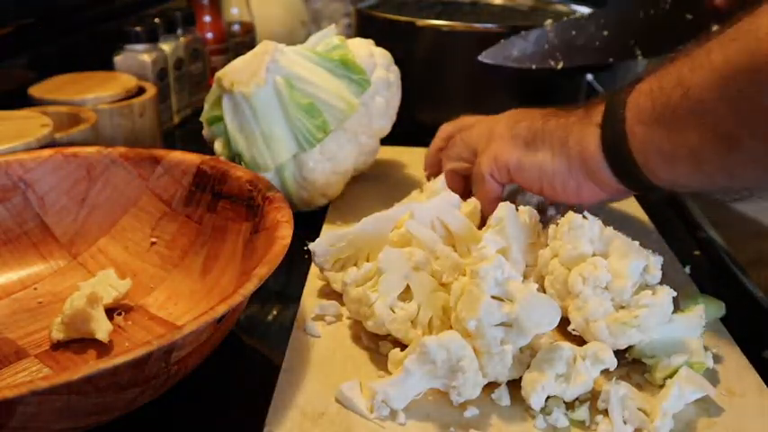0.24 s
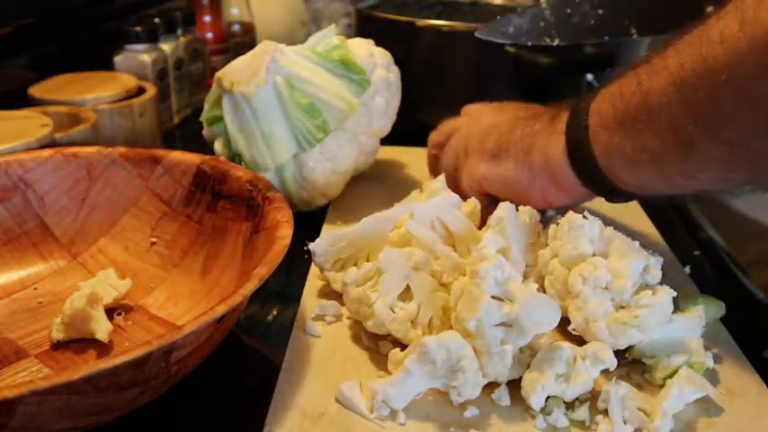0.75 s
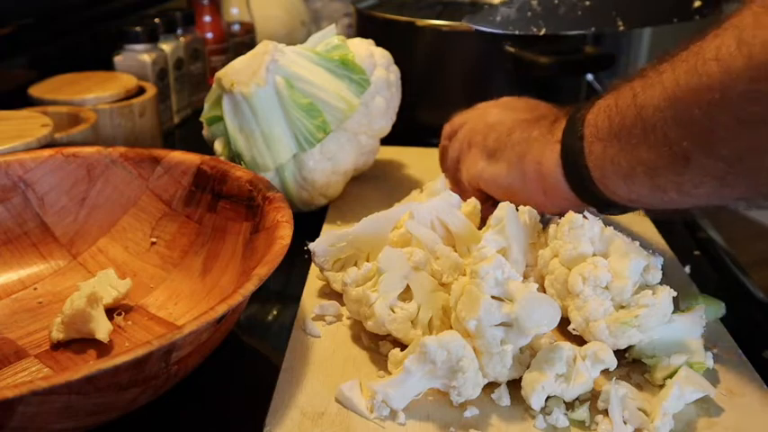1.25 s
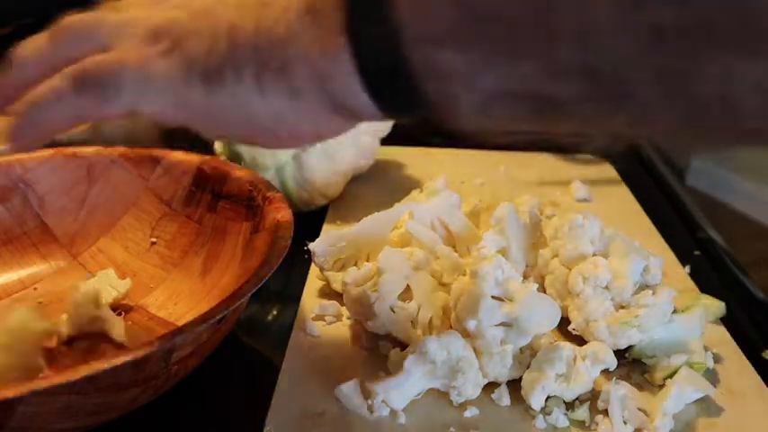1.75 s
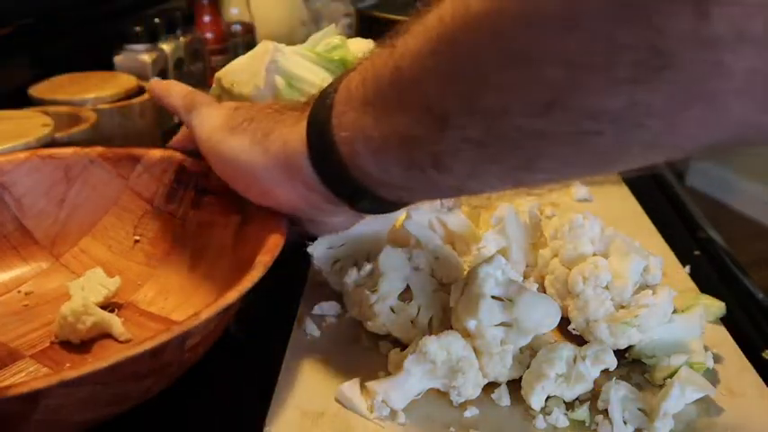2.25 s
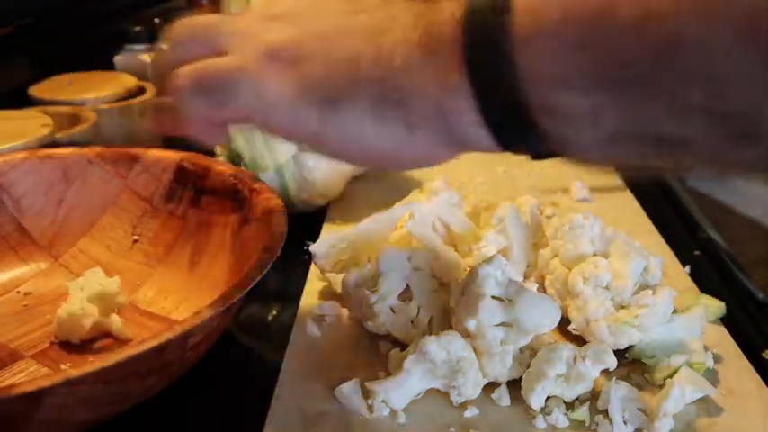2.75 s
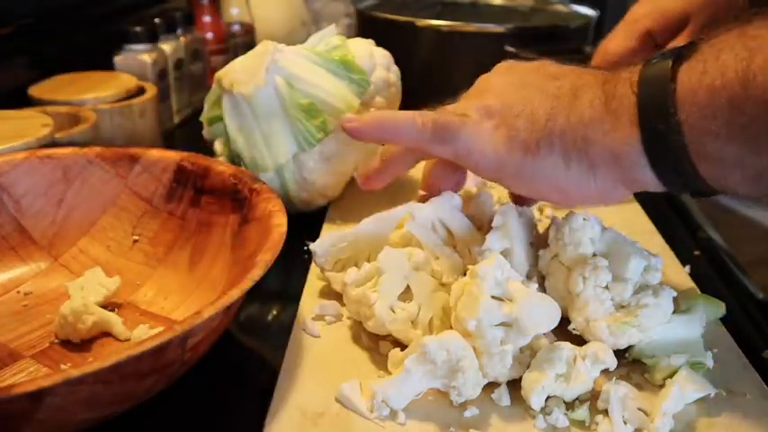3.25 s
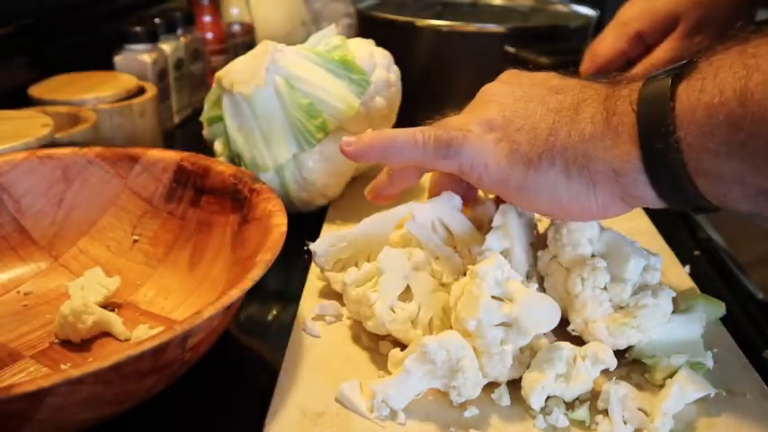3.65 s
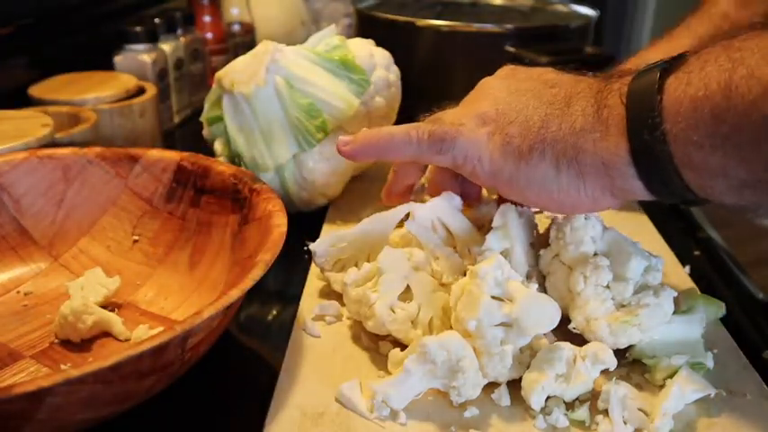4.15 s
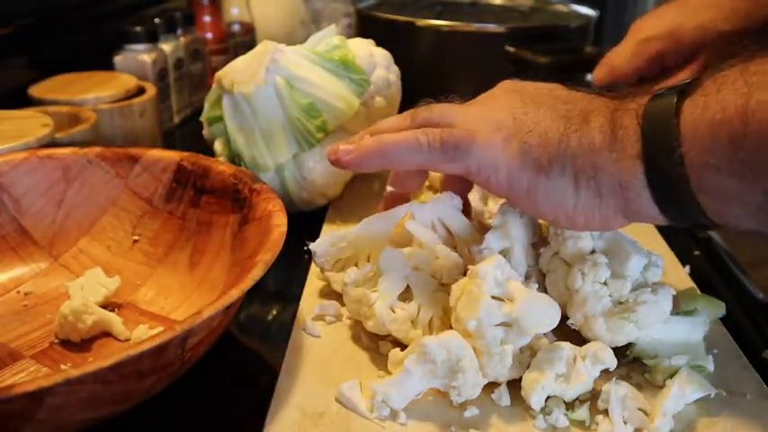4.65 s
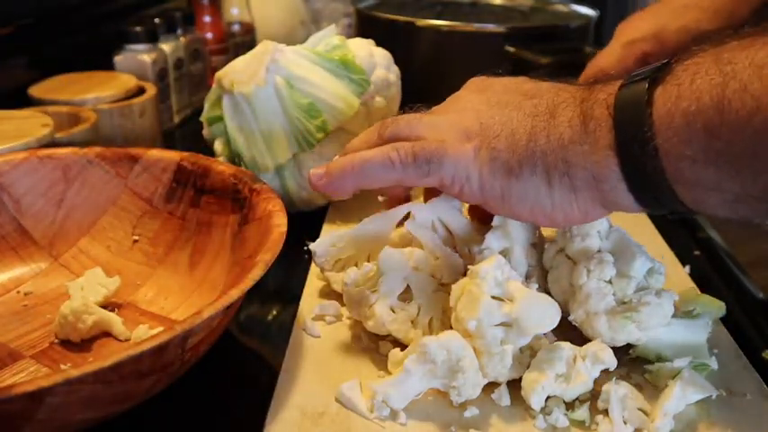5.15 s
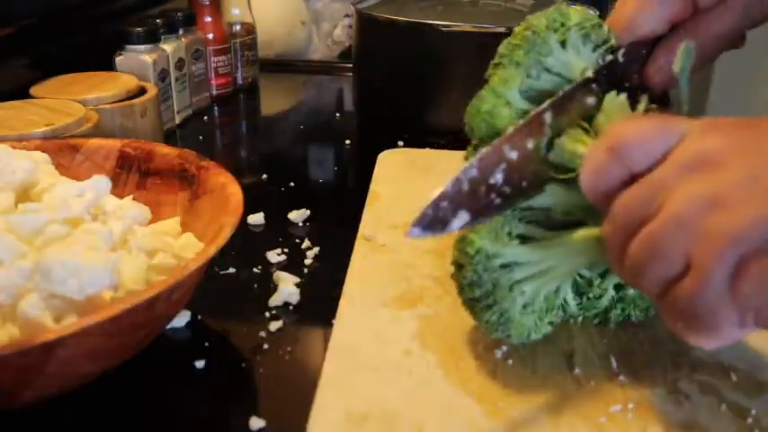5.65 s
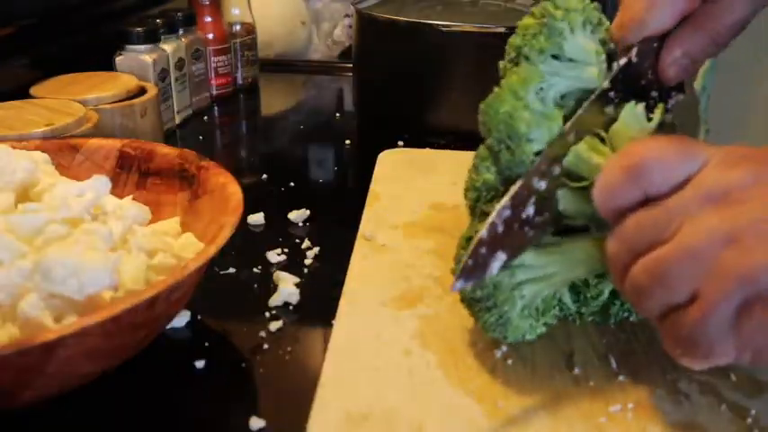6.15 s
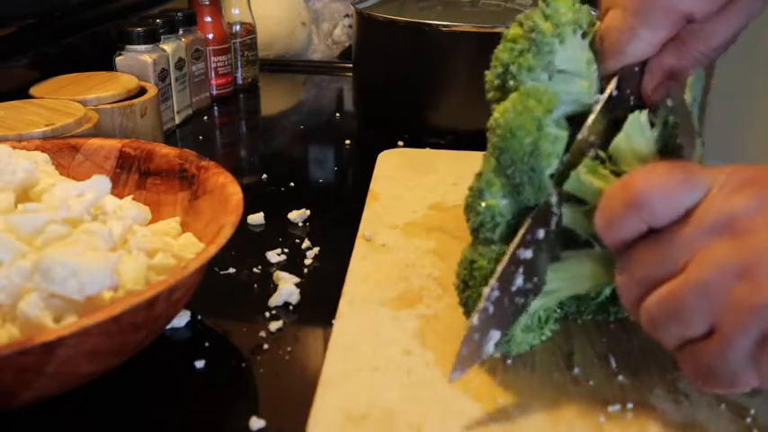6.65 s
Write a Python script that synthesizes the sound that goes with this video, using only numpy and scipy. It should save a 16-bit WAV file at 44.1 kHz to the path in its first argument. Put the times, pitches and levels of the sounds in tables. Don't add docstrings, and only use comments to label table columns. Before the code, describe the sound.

A low, steady refrigerator hum and soft room hush lie under everything in a small home kitchen, heard closely by one microphone, alike on both channels. From 0 to 1.2 seconds fingers rustle very quietly among dry florets, with faint ticks and soft knocks near 0.5 and 1.0, and a tiny dropout around 0.84. At 1.8 pieces hit a wooden bowl in a bright, hollow rattle, rolling and knocking until about 2.4. A piece taps and bounces on the board from 2.8 to 3.1, then it is nearly quiet. Around 4.1 a quick tearing scrape ends in a very loud, hard knife bang at 4.15, with a short room tail. From 5.25, and more fully after 5.45 as the hum drops, short wet sawing strokes crackle through stems; fibres snap at 5.9 and 6.2, judder to 6.3, snap loudest at 6.62, and finish with a dull push.

```python
import sys
import numpy as np
from scipy import signal
from scipy.fft import rfft, irfft, next_fast_len
from scipy.io import wavfile
from scipy.ndimage import uniform_filter1d

SR = 44100
rng = np.random.default_rng(int(sys.argv[2]) if len(sys.argv) > 2 else 0)


def to_wav(s):
    ch = np.atleast_2d(s).T
    pcm = np.round(np.clip(ch, -1, 1) * 32767)
    wavfile.write(sys.argv[1], SR, pcm.astype(np.int16))


def nominal_scale(level):
    x = np.asarray(level, float) / 20
    return 10 ** x


N = 303849

# (time [s], level [dB])
CHOP = (4.1531, 3)


def unit(x):
    return x / np.sqrt(np.mean(x ** 2) + 1e-20)


def along(points, hz):
    f, v = np.transpose(points)
    return np.interp(np.log(hz + 1), np.log(f + 1), v)


def filtered(x, response):
    m = next_fast_len(len(x) + min(len(x), 8192))
    spectrum = rfft(x, m) * response(np.fft.rfftfreq(m, 1 / SR))
    return irfft(spectrum, m)[:len(x)]


def resonance(hz, width_hz):
    return lambda f: 1j * f * width_hz / (hz * hz - f * f + 1j * f * width_hz)


def colour(spectrum):
    return lambda f: nominal_scale(along(spectrum, f))


def noise(spectrum):
    return unit(filtered(rng.standard_normal(N), colour(spectrum)))


def add(track, s, sound):
    part = track[round(s * SR):][:len(sound)]
    part += sound[:len(part)]


def refrigerator():
    # (time [s], level [dB])
    hush = [(15, -55), (25, -31), (85, -19), (130, -13), (200, -10), (260, -11), (420, -16), (630, -21),
            (1000, -25), (1600, -27), (2100, -33), (4000, -36), (8000, -40.5), (16200, -44)]
    hush_level = [(0, -62.5), (5.43, -62.5), (5.47, -64.5), (6.89, -62.5)]
    # (time [s], level [dB])
    hum_level = [(0, -62.5), (5.43, -62), (5.47, -71), (6.89, -77)]
    # (frequency [Hz], width [Hz], level [dB])
    cabinet = [(186, 5.5, -64.5), (235, 11, -74), (330, 7.1, -74), (413.6, 4.7, -73)]
    # (frequency [Hz], width [Hz], level [dB])
    whine = (6700, 60, -92)
    # (time [s], level [dB])
    rumble_level = [(0, -110), (5.3, -80), (5.47, -70), (6.89, -73.5)]
    t = np.arange(N) / SR

    def level(rows):
        return nominal_scale(np.interp(t, *np.transpose(rows)))

    def drone(hz, width_hz):
        return unit(filtered(rng.standard_normal(N), resonance(hz, width_hz)))

    tone = np.sin(2 * np.pi * 119.6 * t) + 0.4 * drone(119.9, 18)
    hum = nominal_scale(1.0) * level(hum_level) * tone
    drones = sum(nominal_scale(db) * drone(hz, width) for hz, width, db in cabinet + [whine])
    rumble = level(rumble_level) * noise([(15, -17.0), (40, -3.5), (80, 2.5), (140, -12.5), (300, -51.5)])
    return hum + drones + rumble + nominal_scale(0.5) * level(hush_level) * noise(hush)


def kitchen(x):
    # (frequency [Hz], t60 [s])
    room_t60 = [(150, 0.88), (500, 0.37), (1500, 0.58), (4500, 0.47), (8000, 0.34), (14000, .12)]
    # (frequency [Hz], level [dB])
    room_tone = [(100, -9), (300, 9), (1500, -7.5), (5000, 0), (9000, -7), (15000, -16)]
    hz, t, z = signal.stft(rng.standard_normal(SR // 2), SR, nperseg=256)
    gain_db = along(room_tone, hz)[:, None] - 60 * t / along(room_t60, hz)[:, None]
    tail = signal.istft(z * nominal_scale(gain_db), SR, nperseg=256)[1]
    delayed = np.pad(x, (200, 0))
    return signal.fftconvolve(delayed, tail / np.linalg.norm(tail))[:N]


def patchy(x, depth_db):
    z = signal.stft(x, nperseg=128)[2]
    field = uniform_filter1d(rng.standard_normal(z.shape), size=4, axis=0)
    field = uniform_filter1d(field, size=5, axis=1)
    return signal.istft(z * nominal_scale(depth_db * unit(field)), nperseg=128)[1][:N]


def rubbing(strokes, spectrum, rate, scatter_db, smooth, slow=()):
    # (frequency [Hz], density [dB per Hz])
    body = [(200, -27.5), (500, -2), (900, -2.5), (1600, -3.5), (2600, -11.5), (5000, -54.5)]
    quick_rise, lean_rise, fall = 0.16, 0.46, 0.38
    t, fine, dull = np.arange(N) / SR, np.zeros(N), np.zeros(N)
    for rows, rise in ((strokes, quick_rise), (slow, lean_rise)):
        for s, length, db, body_db in rows:
            corners = [0, rise, max(1 - fall, rise), 1]
            shape = np.interp(t[t < length] / length, corners, [0, 1, 1, 0]) ** 2
            add(fine, s, nominal_scale(db) * shape)
            add(dull, s, nominal_scale(db + body_db) * shape)
    strength = nominal_scale(scatter_db * np.clip(rng.standard_normal(N), -2, 2))
    fractures = (rng.random(N) < rate / SR) * strength
    grit = unit(signal.fftconvolve(fractures, nominal_scale(-60 * t[:400] / .004))[:N])

    def excite(spec):
        rough = patchy((smooth + grit) * rng.standard_normal(N), depth_db=3.0)
        return unit(filtered(rough, colour(spec)))

    return fine * excite(spectrum) + dull * excite(body)


def fingers():
    # (time [s], length [s], level [dB], body [dB])
    rustles = [(.0, 0.054, -74.5, 8.5), (.17, 0.29, -69.5, -5), (.35, 0.13, -66.5, -1.5),
               (.445, 0.11, -62, 2), (.49, 0.031, -64.5, 8.5), (.565, 0.088, -76, 6), (.62, .1, -65.5, 1.5),
               (.695, 0.037, -73.5, 9.5), (1.013, 0.0084, -56.5, 2.5), (1.095, 0.036, -63.5, 0),
               (2.417, 0.056, -61, -10), (2.485, 0.17, -76, -24.5), (3.91, 0.2, -72.5, -18)]
    # (frequency [Hz], density [dB per Hz])
    dry_spectrum = [(880, -32), (1500, -11), (3150, -13), (3620, -10), (6430, -14), (12000, -24),
                    (16000, -44)]
    return rubbing(rustles, dry_spectrum, rate=600, scatter_db=4.1, smooth=2.2)


def rolling():
    # (time [s], length [s], level [dB], body [dB])
    tumbles = [
        (1.8, 0.11, -48.5, -24),
        (1.86, 0.16, -63, 4),
        (1.975, 0.26, -68.5, -16),
        (2.105, 0.12, -66, -14),
        (2.15, 0.04, -49.5, -4.5),
        (2.22, 0.18, -58.5, -8),
        (2.32, 0.44, -66, -24.5),
        (3.135, 0.09, -69.5, -1),
    ]
    # (frequency [Hz], density [dB per Hz])
    roll = [(880, -34.5), (1500, -19.5), (3000, -4.5), (3660, -4.5), (4240, -1.5), (8400, -15.5),
            (11700, -19.5), (16000, -35)]
    return rubbing(tumbles, roll, rate=500, scatter_db=4.2, smooth=2.2)


def crack(hz, spread, sheen_db, t60, spike=1):
    t = np.arange(SR // 12) / SR
    a, b = rng.standard_normal((2, len(t)))
    a[0] = b[0] = spike
    band, bright = resonance(hz, spread * hz), resonance(hz=11000, width_hz=9000)
    core = filtered(a * nominal_scale(-60 * t / t60), lambda f: band(f) ** 2 / (1 + 1j * f / (3.3 * hz)))
    sheen = filtered(b * nominal_scale(-140 * t / t60), lambda f: bright(f) ** 2)
    return core / np.abs(core).max() + nominal_scale(sheen_db) * sheen / np.abs(sheen).max()


def ring(modes, attack):
    t = np.arange(SR // 9) / SR
    tone = np.zeros(len(t))
    for (hz, db, t60), luck_db in zip(modes, rng.normal(0, 1.2, len(modes))):
        tone += nominal_scale(db + luck_db - 60 * t / t60) * np.sin(2 * np.pi * hz * t)
    return tone * (1 - np.exp(-t / attack))


def knocks():
    # (time [s], peak [dB], spot [Hz], share of the whole bowl [dB])
    landings = [(0.205, -49.5, 331, 0.5), (0.499, -39.5, 307, -11), (1.0145, -38, 300, -10.5),
                (1.7993, -12.5, 822, -11), (1.8188, -14.5, 830, -13), (1.828, -26.5, 810, 0),
                (1.837, -32.5, 840, 4.5), (1.8585, -19.5, 568, -14), (1.884, -35, 575, -7),
                (1.923, -38.5, 805, 5.5), (1.9535, -30, 280, -9), (1.9694, -14.5, 788, -10),
                (2.0095, -44, 800, -14), (2.0365, -40.5, 578, -20), (2.0525, -43, 670, -8),
                (2.1115, -39.5, 710, -12), (2.151, -34, 730, -9), (2.166, -23.5, 476, -6),
                (2.251, -42, 744, -15), (2.302, -26, 745, -9.5), (2.816, -31, 595, -9.5),
                (2.922, -47, 456, 7), (2.993, -46, 384, -4), (3.032, -48.5, 480, -1.5),
                (3.071, -46.5, 810, -12), (3.095, -53.5, 510, 4), (6.646, -38, 650, -13),
                (6.874, -44, 940, -13)]
    # (time [s], peak [dB], spot [Hz], t60 [s], share of
    # the bowl [dB])
    rim = [(1.859, -30, 265, 0.06, -23), (1.9705, -31, 380, 0.058, -12), (2.1523, -33, 1120, 0.044, -18),
           (2.3022, -31, 1150, 0.045, -29), (2.303, -37.5, 1485, 0.047, -24),
           (1.8586, -23.5, 785, .02, -20), (2.168, -31.5, 683, 0.047, -26), (1.7988, -24.5, 2630, .02, -30),
           (1.799, -26, 3900, 0.018, -28.5), (1.8192, -19, 3030, 0.02, -30),
           (1.8192, -17.5, 2293, 0.028, -29.5), (2.8181, -33.5, 370, 0.039, -1),
           (4.1545, -19, 190, 0.026, -30), (4.157, -23.5, 270, 0.12, -7.5), (1.8045, -25, 700, .014, -20),
           (4.163, -14, 2080, .022, -40), (4.1625, -21, 1060, .03, -40), (4.1535, -20, 3850, .02, -40),
           (1.868, -29, 560, 0.059, -21), (1.0195, -42, 230, .05, -20), (4.1961, -28, 577, 0.12, -19.5),
           (4.4746, -36.5, 234, 0.065, -15.5), (4.476, -36.5, 350, 0.045, -19.5),
           (2.251, -43, 1110, 0.034, -21)]
    # (frequency [Hz], level [dB], t60 [s])
    bowl_modes = [(170, -10.5, 0.029), (254, -3.5, 0.04), (337, -2, 0.033), (543.5, -3, 0.033),
                  (740, 6, 0.012), (1091, -12, 0.052), (1343, -18, 0.0068)]
    # (time [s], level [dB], softness [dB per octave])
    taps = [
        (2.8158, -24.5, -0.5),
        (2.9222, -34.5, -1.5),
        (2.993, -50.5, -6.5),
        (3.033, -50, -0.5),
    ]
    # (frequency [Hz], level [dB], t60 [s])
    slab = [(545, -5, 0.045), (632, -14.5, 0.1), (810, -9, 0.029), (1205, -11.5, 0.033), (1905, -5, 0.022),
            (2790, -8, 0.02), (3470, -16, 0.02)]
    out = np.zeros(N)
    spots = [(s, db, hz, 0.032, share_db) for s, db, hz, share_db in landings]
    for s, db, hz, t60, bowl_db in spots + rim:
        add(out, s, nominal_scale(db - 2.5) * ring([(hz, 0, t60)], attack=0.00078))
        add(out, s, nominal_scale(db + bowl_db) * ring(bowl_modes, attack=0.00095))
        add(out, s, nominal_scale(db - 18) * crack(0.91 * hz, 0.48, -56.0, 2.2 * t60))
    for s, db, tilt_db in taps:
        tilted = [(hz, g + tilt_db * np.log2(hz / slab[0][0]), t60) for hz, g, t60 in slab]
        add(out, s, nominal_scale(db) * ring(tilted, attack=0.00029))
    return out


def cracks(events, spread, after_db, linger):
    out = np.zeros(N)
    wide = max(.8 * spread, .8)
    for s, db, hz, sheen_db, t60 in events:
        add(out, s + .0006, nominal_scale(db) * crack(hz, spread, sheen_db, 0.12 * t60, spike=3.2))
        add(out, s + .0008, nominal_scale(db + after_db) * crack(hz, wide, sheen_db, linger * t60))
    return out


def thuds():
    # (time [s], peak [dB], centre [Hz], sheen [dB], t60 [s])
    hits = [(1.8125, -32.5, 4500, -12, 0.072), (1.8193, -17, 5100, -16, 0.035),
            (1.9241, -29, 5570, -24, 0.017), (2.1511, -53, 1046, -40, .04), (2.4351, -48, 3300, -16, 0.061),
            (2.8161, -38, 1630, -41, 0.1), (2.8165, -40, 5360, -22.5, 0.017),
            (2.9221, -42, 4290, -26, 0.035), (3.0331, -51.5, 5090, -23, 0.077),
            (6.6174, -25, 1715, -42, 0.012), (6.6176, -43.5, 800, -38, 0.013),
            (5.762, -38.5, 2600, -30, .06), (5.78, -37.5, 3080, -30, .06),
            (6.5466, -42.5, 4300, -30.5, 0.055), (6.64, -38, 4300, -30.5, .06),
            (6.6174, -15, 5570, -2, 0.018), (5.9018, -26, 4520, -21.5, 0.013)]
    return cracks(hits, spread=0.3, after_db=-5.0, linger=0.85)


def floret_cracks():
    # (time [s], peak [dB], centre [Hz])
    breaks = [(0.501, -51.5, 2430), (1.0124, -56, 2180), (1.7982, -19, 2950), (1.8188, -13, 2850),
              (1.8296, -24, 2660), (1.8376, -27, 2550), (1.8564, -32, 1800), (1.8648, -37, 2380),
              (1.9235, -28, 3360), (1.9684, -37, 2450), (1.9745, -31, 3900), (2.0225, -41, 3450),
              (2.077, -49, 4220), (2.151, -46, 3450), (2.1664, -40, 3660), (2.246, -48, 6600),
              (2.3274, -55, 6500), (2.4279, -48.5, 3300), (2.8156, -29.5, 2770), (2.9226, -43, 2520),
              (3.032, -51, 1980), (3.186, -60.5, 5040), (3.2598, -59, 4800), (3.5028, -49, 4550),
              (3.9394, -54, 4030), (4.195, -25.5, 1500), (4.212, -33, 1300), (4.33, -60, 8100),
              (4.386, -62, 8000), (4.4692, -52.5, 1817), (5.0794, -51.5, 5160)]
    # (sheen of a -35 dB crack [dB], slope [dB per dB])
    sheen_law = (-25.5, -.6)
    events = []
    for s, db, hz in breaks:
        sheen_db = sheen_law[0] + sheen_law[1] * (db + 35)
        events.append((s, db, hz, sheen_db, 0.055))
    return cracks(events, spread=0.29, after_db=-2.5, linger=0.95)


def tears(events):
    rise_s, hold_s, drop_t60 = .0001, .0008, .007
    tail_db, tail_t60 = -13, 0.072
    out, t = np.zeros(N), np.arange(SR // 30) / SR
    after = np.clip(t - hold_s, 0, None)
    decay = np.maximum(nominal_scale(-60 * after / drop_t60), nominal_scale(tail_db - 60 * after / tail_t60))
    shape = np.clip(t / rise_s, 0, 1) * decay
    size = np.sqrt(SR * hold_s)
    bright = resonance(hz=11000, width_hz=6500)
    for s, db, hz, sheen_db in events:
        a, b = rng.standard_normal((2, len(t))) * shape
        a[0] = b[0] = 5
        band = resonance(hz, 1.3 * hz)
        core = filtered(a, lambda f: band(f) ** 2)
        sheen = filtered(b, lambda f: bright(f) ** 2)
        burst = core / np.linalg.norm(core) + nominal_scale(sheen_db) * sheen / np.linalg.norm(sheen)
        add(out, s, nominal_scale(db) * size * burst)
    return out


def contacts():
    # (time [s], level [dB], centre [Hz], sheen over crack [dB])
    ticks = [(0.4525, -59.5, 6000, 0), (0.476, -56, 1300, -14), (0.552, -61, 1400, -15),
             (0.593, -61, 1500, -15), (0.659, -58.5, 1900, -14), (0.678, -58, 1700, -14),
             (1.0135, -51, 1400, -4), (1.0945, -53, 2500, -4), (1.106, -53, 2200, -10),
             (1.128, -59, 2300, -22), (1.2328, -60, 6500, -7), (1.7986, -29, 3770, -22),
             (1.8168, -27, 3300, -18), (1.818, -26, 3600, -18), (1.8065, -32, 3500, -22),
             (1.8275, -25, 3300, -20), (2.1668, -41, 5000, -12), (1.8205, -19, 5500, -20),
             (1.8572, -31, 3000, -26), (1.9686, -41, 4000, -20), (1.9738, -39, 4960, -26),
             (2.0212, -44.5, 4100, -25), (2.8158, -36, 1400, -28), (2.8162, -42, 4500, -24),
             (2.9224, -46, 1300, -19), (2.9226, -50, 5000, -15), (3.0328, -55.5, 4500, -10.5),
             (5.848, -47, 3496, -14.5), (5.953, -50, 4690, -14.5), (6.0875, -56, 4000, -5.5)]
    return tears(ticks)


def chop():
    # (frequency [Hz], level [dB], t60 [s])
    board = [(286, -22.5, .08), (328.3, -27, 0.13), (604, -21.5, 0.054), (806, -13.5, .035),
             (1058.6, -16.5, .035), (1330, -13.5, 0.028), (1600, -24, .012), (1813, -5.5, 0.021),
             (2080, -8, .025), (2640, -11, .012), (2880, -8.5, .012), (4320, -15.5, .022),
             (5120, -22, 0.029), (6150, -9, 0.0073)]
    # (delay [s], level [dB])
    walls = [(.0008, -2.5), (.002, -5), (.0042, -8), (.006, -14.5), (.009, -11), (.011, -11), (0.0164, -19)]
    out = np.zeros(N)
    s, db = CHOP
    add(out, s, nominal_scale(db - 0.7) * ring(board[:4], attack=.002))
    add(out, s, -nominal_scale(db - .4) * ring(board[4:], attack=.00005))
    add(out, s, nominal_scale(db - 21.0) * crack(5400, 0.19, -19.5, 0.0046))
    add(out, s + .004, nominal_scale(db - 21.5) * crack(1300, 1.8, -48.5, 0.1))
    for delay, wall_db in walls:
        add(out, s + delay, nominal_scale(db + wall_db - 11) * crack(1500, 0.97, -51.5, 0.0067))
        add(out, s + delay, nominal_scale(db + wall_db - 16.5 - 400 * delay) * crack(4800, 0.41, -46.0, 0.015))
    return out


def blow():
    # (frequency [Hz], level [dB])
    bang = [(150, -4), (300, -5.5), (600, -2.5), (1000, 2), (2000, 4.5), (3200, -7.5), (4200, -13.5),
            (5100, -8.5), (6500, -19.5), (10000, -23.5)]
    impulse = np.zeros(N)
    impulse[round(CHOP[0] * SR)] = 1
    return filtered(impulse, colour(bang))


def singing():
    # (time [s], length [s], level [dB], frequency [Hz])
    songs = [
        (6.46, 0.17, -66, 4400),
        (6.62, .11, -65, 4360),
        (5.75, 0.087, -58, 2600),
        (5.4, 0.059, -62, 3300),
        (2.265, .055, -57, 3350),
        (2.42, .037, -55, 3250),
        (6.125, .022, -52, 4500),
    ]
    out = np.zeros(N)
    t = np.arange(SR // 5) / SR
    for s, length, db, hz in songs:
        narrow = resonance(hz, width_hz=450)
        tone = unit(filtered(rng.standard_normal(len(t)), lambda f: narrow(f) ** 2))
        add(out, s, nominal_scale(db) * tone * np.sin(np.pi * np.clip(t / length, 0, 1)))
    return out


def sawing():
    # (time [s], length [s], level [dB], body [dB])
    strokes = [(4.055, 0.043, -63.5, -18), (4.083, 0.052, -50, -15), (4.105, 0.063, -49, -8),
               (5.23, 0.067, -65.5, -21), (5.283, 0.058, -58, -11.5), (5.345, 0.029, -70, -18.5),
               (5.39, 0.099, -50.5, -17.5), (5.787, 0.059, -51, -21), (5.84, 0.014, -62, 1),
               (5.89, 0.04, -49.5, -7), (5.92, 0.095, -64.5, -12), (6.075, 0.11, -60, -17),
               (6.182, 0.03, -55, -7), (6.22, 0.1, -54.5, -12), (6.4, 0.11, -57.5, -37),
               (6.544, 0.027, -55, -6.5), (6.56, 0.088, -62, -23), (6.618, 0.047, -51.5, -2),
               (6.742, 0.049, -57.5, 2)]
    # (time [s], length [s], level [dB], body [dB])
    pressing = (5, 3.5, -63.5, -7.5)
    # (time [s], length [s], level [dB], body [dB])
    leans = [
        (4.115, 0.068, -37.5, -8),
        (5.545, 0.15, -53.5, -9.5),
        (5.74, 0.074, -48.5, -15.5),
        (6.82, 0.2, -52.5, 2.5),
    ]
    # (frequency [Hz], density [dB per Hz])
    wet_spectrum = [(710, -33), (1200, -7.5), (1930, -4.5), (3010, 0.5), (3510, -0.5), (6160, 1),
                    (8350, -10.5), (10400, -6), (13300, -10.5), (16000, -24.5)]
    return rubbing(strokes + [pressing], wet_spectrum, rate=500, scatter_db=4, smooth=2.8, slow=leans)


def snapping():
    # (time [s], level [dB], centre [Hz], sheen over crack [dB])
    snaps = [(5.2882, -61, 5000, -3), (5.3012, -56, 4960, -6), (5.3989, -49.5, 4000, -5),
             (5.4135, -45, 4530, -12.5), (5.4325, -50, 4500, -11), (5.4412, -53, 3480, -15),
             (5.4572, -53, 5470, -3.5), (5.5766, -49, 2790, -16), (5.607, -54.5, 5000, -5),
             (5.6153, -56, 4000, 0), (5.6232, -54, 4950, -5), (5.6304, -49, 2500, 0),
             (5.6619, -59.5, 5000, 5), (5.6888, -57, 5120, 4), (5.7475, -44, 2600, 1),
             (5.7605, -49, 3000, -1), (5.774, -49, 4500, -10), (5.7825, -43, 3180, -15),
             (5.799, -50, 4500, -3), (5.822, -49.5, 6000, -9), (5.844, -44, 2600, -18),
             (5.8942, -45, 4500, -10), (5.902, -32.5, 4830, 0), (5.9226, -34.5, 5280, 1),
             (6.0465, -59, 4590, 1), (6.0684, -60.5, 6530, -1), (6.076, -61, 6000, 0),
             (6.1094, -50.5, 4630, -4), (6.1288, -50, 4500, -6), (6.134, -45, 4590, -16.5),
             (6.1841, -31.5, 5300, -5.5), (6.1995, -48, 4000, -7), (6.3528, -45, 2500, -12),
             (6.4089, -36, 4930, -8), (6.42, -58, 4000, -6.5), (6.5466, -34, 3800, -1.5),
             (6.6075, -58, 9000, 5.5), (6.6179, -24.5, 5200, 1.5), (6.6348, -27, 5000, -20),
             (6.6487, -50, 9000, -1), (6.748, -42, 2590, -18), (6.752, -43, 3500, -16),
             (6.76, -43, 5500, -17), (6.8395, -55.5, 5000, -12.5), (6.866, -59, 5980, -5),
             (6.875, -46.5, 3990, -16.5)]
    # (time [s], level [dB], centre [Hz], sheen over crack [dB])
    judder = [(6.2175, -52, 6000, -1), (6.2216, -42, 5000, 0.5), (6.224, -45, 4520, -1.5),
              (6.2344, -45.5, 5500, -2), (6.238, -40, 4800, -8), (6.2415, -42, 5800, -3.5),
              (6.249, -44.5, 4000, 3.5), (6.253, -45, 3500, -4), (6.2581, -47.5, 4500, 4),
              (6.2612, -51, 5000, 1), (6.268, -40, 5500, -0.5), (6.274, -40, 5000, 5),
              (6.2771, -40.5, 4000, 2), (6.2804, -34, 5500, -8), (6.2866, -31, 5270, -13),
              (6.2893, -40.5, 5500, -2.5), (6.294, -37, 5000, -3.5), (6.3003, -45, 6000, 0),
              (6.3023, -39, 4500, -4.5)]
    return tears(snaps + judder)


def scene():
    florets = fingers()
    bowl = knocks() + thuds() + floret_cracks() + rolling() + contacts()
    stems = snapping() + sawing()
    wet = nominal_scale(-22) * kitchen(bowl + florets) + nominal_scale(-22.0) * kitchen(stems) + nominal_scale(10.0) * kitchen(blow())
    direct = florets + bowl + stems + chop() + singing()
    near = filtered(direct + wet, lambda f: (1j * f / (150 + 1j * f)) ** 3)
    return np.tile(near + refrigerator(), (2, 1))


def roll_off(x):
    return signal.sosfilt(signal.butter(12, 16360, fs=SR, output="sos"), x)


def record(dry):
    # (time [s], half width [s])
    notch = (.838, .007)
    dip = np.clip(np.abs(np.arange(N) / SR - notch[0]) / notch[1], .05, 1)
    limited = filtered(dry[0], lambda f: 1 / (1 + (f / 15850) ** 60))
    mix = np.clip(limited * dip, -1, 1) * np.ones_like(dry)
    return roll_off(mix)


dry = scene()
out = record(dry)
to_wav(out)
```